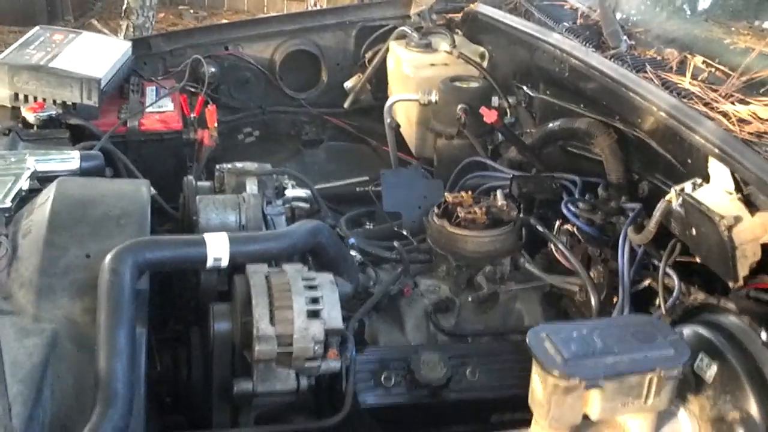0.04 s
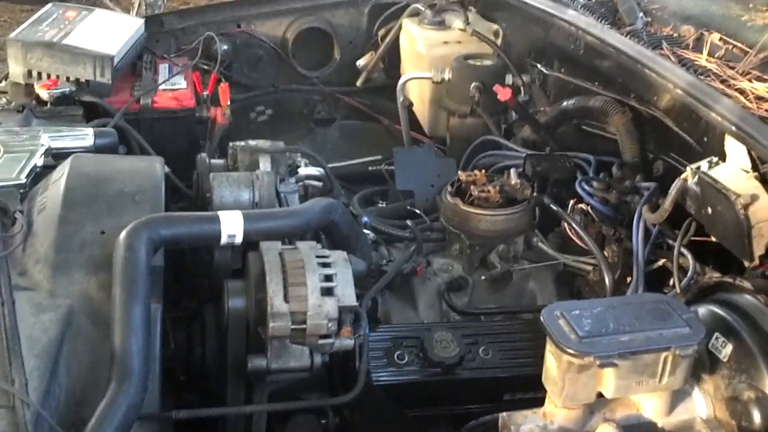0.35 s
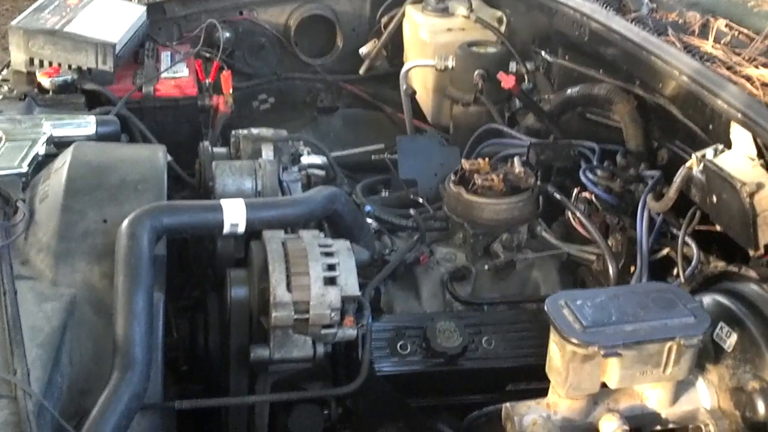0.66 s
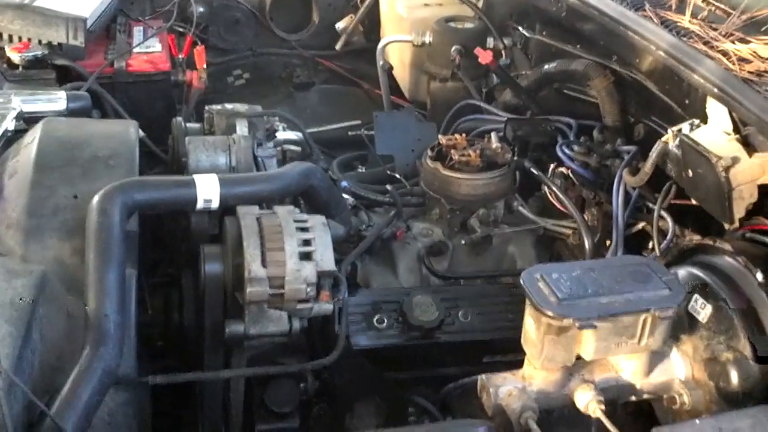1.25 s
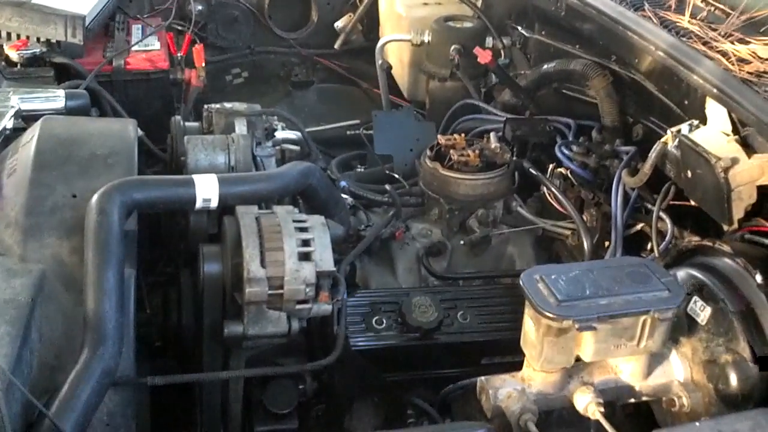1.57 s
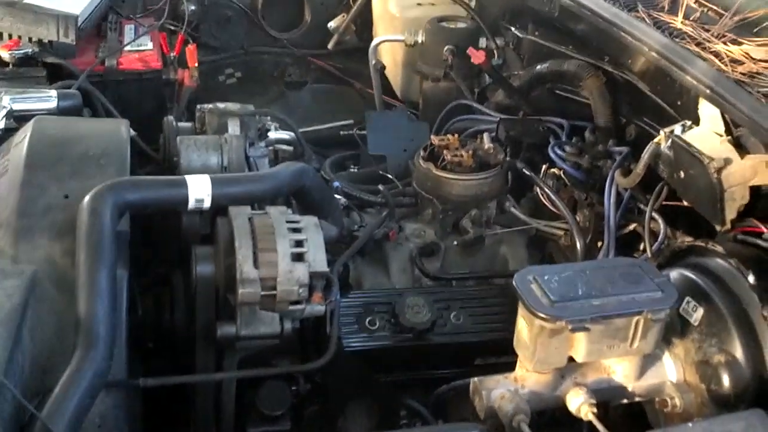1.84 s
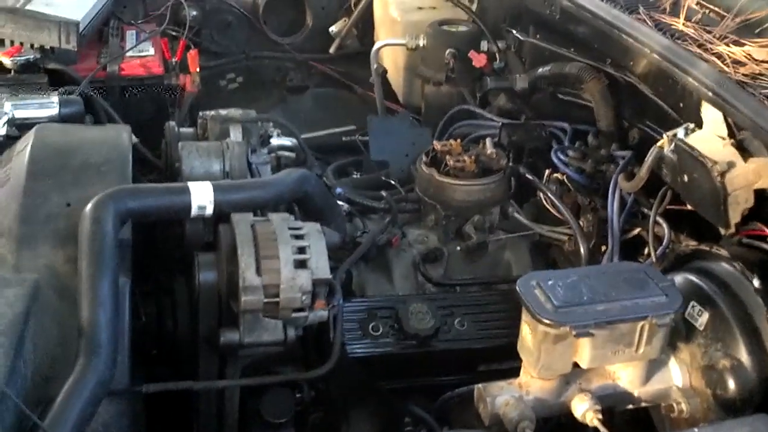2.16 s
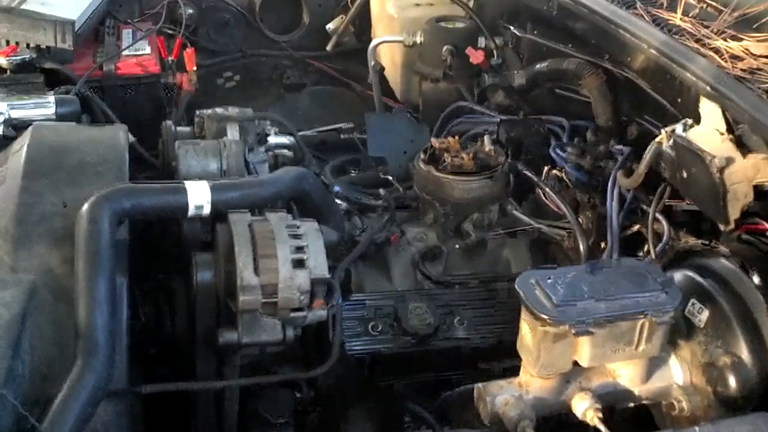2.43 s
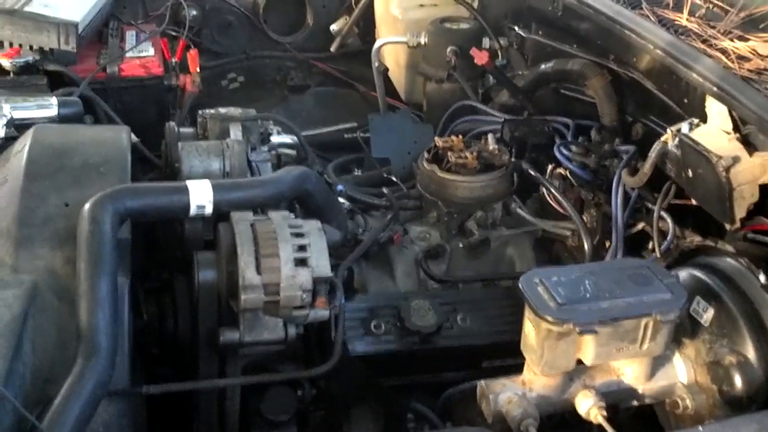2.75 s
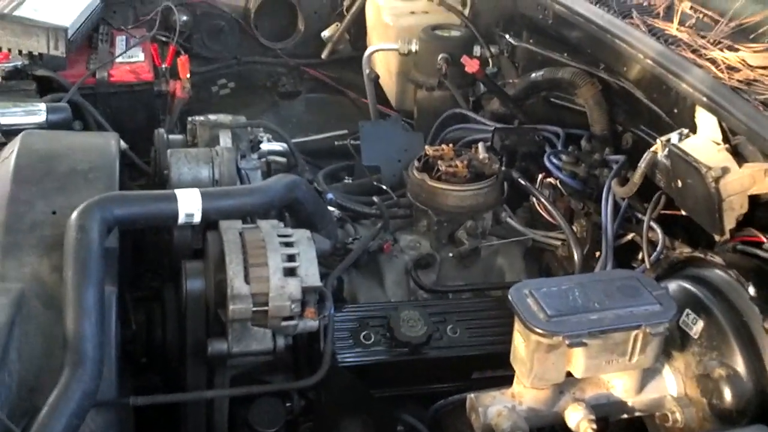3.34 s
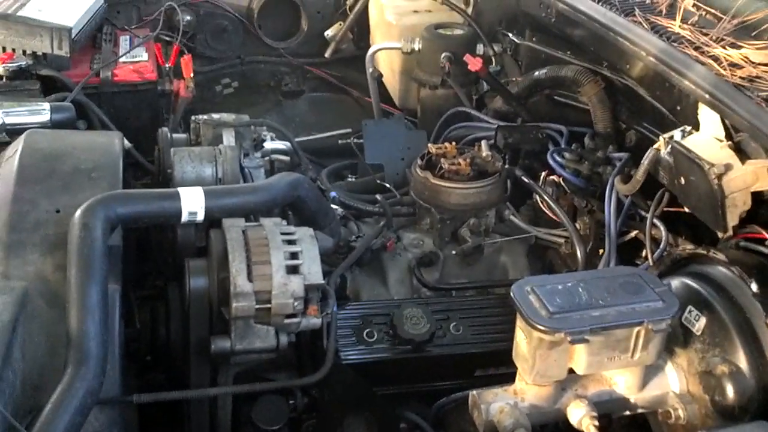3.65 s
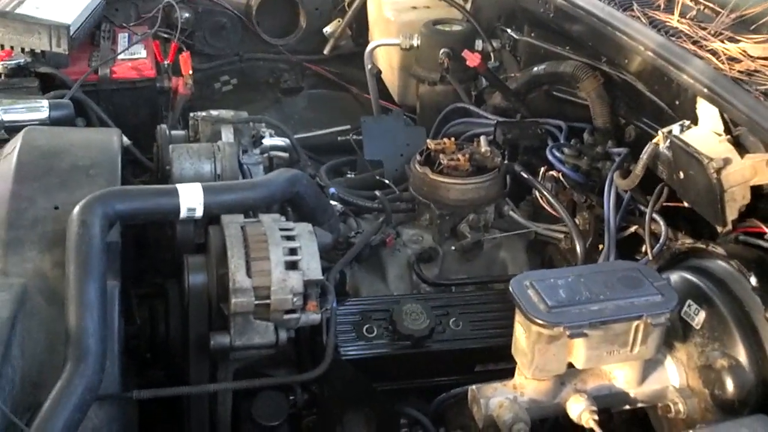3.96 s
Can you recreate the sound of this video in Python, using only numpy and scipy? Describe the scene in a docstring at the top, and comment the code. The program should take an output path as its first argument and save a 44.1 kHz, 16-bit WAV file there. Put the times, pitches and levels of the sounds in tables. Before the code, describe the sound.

A V8 engine idles steadily outdoors, heard from just above the open engine bay. Its low, slightly loping drone runs throughout, along with quick valve ticking, a high alternator whine, rushing fan air and a light hiss.

```python
"""An idling V8 engine

Heard from just above the open engine bay, the uneven firing makes a low drone and the valves clatter
in step. The belt turns a whining alternator and a fan, whose rush of air fills the bay over a light hiss.
The recorder widens the treble with a comb: left and right channels swing between in step and opposed."""
import sys
import numpy as np
from scipy.fft import rfft, irfft, next_fast_len
from scipy.io import wavfile
from scipy.ndimage import map_coordinates

SR = 44100
rng = np.random.default_rng(int(sys.argv[2]) if len(sys.argv) > 2 else 0)


def unload_audio(sound):
    """Save the sound as a 16-bit wav file, at the path given as the first command line argument."""
    columns = np.transpose(np.atleast_2d(sound))
    # keep every value between -1 and 1, then stretch to whole-number steps
    steps = np.round(np.clip(columns, -1, 1) * 32767)
    wavfile.write(sys.argv[1], SR, steps.astype(np.int16))


N = 176400  # 4 seconds
CYLINDERS = 8  # each fires once per engine cycle


def amp(db):
    """Turn decibels into a gain."""
    return 10 ** (np.asarray(db) / 20)


def unit(x):
    """Scale a signal to an average power of 1."""
    return x / np.sqrt(np.mean(x ** 2) + 1e-20)


def along(points, hz):
    """Read between (Hz, value) points on a log frequency axis."""
    freqs, values = np.transpose(points)
    return np.interp(np.log(hz + 1), np.log(freqs + 1), values)


def curve(rows):
    """Join (seconds, value) points, giving one value per sample."""
    return np.interp(np.arange(N) / SR, *np.transpose(rows))


def swell(rows):
    """A gain that follows a dB curve's rise and fall around its own average."""
    db = curve(rows)
    return amp(db - db.mean())


def wobble(rate):
    """A smooth curve through `rate` random values a second."""
    knots = rng.standard_normal(int(N * rate / SR) + 4)
    return map_coordinates(knots, [np.arange(N) * rate / SR], mode="mirror")


def filtered(x, response):
    """Scale and shift each frequency of x by response(hz)."""
    size = next_fast_len(N + SR // 2)
    return irfft(rfft(x, size) * response(np.fft.rfftfreq(size, 1 / SR)), size)[..., :N]


def tone(turns, flutter_db, jitter_rad, rate):
    """One tone, slightly unsteady in level and phase."""
    return unit(amp(flutter_db * wobble(rate)) * np.sin(2 * np.pi * turns + jitter_rad * wobble(rate)))


def tones(table, turns, flutter_db, jitter_rad, rate):
    """Stereo tones at multiples of one rate, offset in phase so that each pulse is smeared in time."""
    smear_turns = 0.203
    return sum(amp([[left], [right]]) * tone(k * turns + smear_turns * k ** 2, flutter_db, jitter_rad, rate)
               for k, left, right in table)


# How far the channels are out of step below the treble. Each row: frequency in Hz, left's lead in radians.
LEFT_LEAD = [(40, 1.7), (100, 1.35), (400, 1.15), (600, -.9), (850, -.15), (1378, 0)]
COMB_HZ = 2756  # the stereo-widening comb starts at half this frequency and repeats every COMB_HZ


def stereo_phase(hz):
    """The left channel's lead in radians: a gentle curve in the bass, the comb's half-turn steps above."""
    dwell = 0.97  # near 1, the steps are flat
    ramp = np.maximum(2 * np.pi * hz / COMB_HZ - np.pi, 0)
    return along(LEFT_LEAD, hz) + ramp - dwell * np.sin(2 * ramp) / 2


# Wide noise that differs between left and right channels.
# Each row: frequency in Hz, its greatest level in dB against the centre noise.
DIFFUSE_NOISE = [(60, -10), (250, -6.5), (520, -4), (900, -14), (1400, -13), (1800, 4), (2100, 6),
                 (3600, 3.5), (4800, 6), (15000, -15)]


def air_noise(spectrum):
    """Centre noise plus wide, diffuse noise, strongest between the steps of the stereo-widening comb."""
    def wide_gain(hz):
        between_steps = np.where(hz < COMB_HZ / 2, 1, np.abs(np.sin(stereo_phase(hz))))
        return amp(along(DIFFUSE_NOISE, hz)) * between_steps

    pair = rng.standard_normal(N) + filtered(rng.standard_normal((2, N)), wide_gain)
    return filtered(pair, lambda hz: amp(along(spectrum, hz)) * np.sqrt(SR / 2 / (1 + wide_gain(hz) ** 2)))


# The tone colour of the hiss. Each row: frequency in Hz, level in dB per Hz.
HISS_SPECTRUM = [(500, -120), (2000, -94), (3100, -75), (3700, -67.5), (4400, -67.5), (5100, -69),
                 (5900, -68), (7000, -72), (8400, -73), (9800, -78), (11600, -83.5), (13000, -75),
                 (14400, -73.5), (16000, -75.5)]
# How the hiss rises and falls. Each row: time in seconds, relative level in dB.
HISS_SWELL = [(0, -35), (0.13, -33.5), (0.3, -34.5), (0.75, -34), (0.85, -33.5), (0.92, -34), (0.99, -34),
              (1.1, -35.5), (1.22, -33), (1.32, -35), (1.41, -33.5), (1.52, -35), (2.7, -34.5),
              (2.9, -34.5), (3.1, -34), (3.72, -35), (3.82, -33.5), (3.9, -35)]


def hiss(cycles):
    """The belt and intake hiss, pulsing lightly as each cylinder draws in air."""
    pulsing = 1 + 0.048 * np.cos(2 * np.pi * cycles * CYLINDERS)
    flutter = amp(0.5 * wobble(rate=25.08))
    return flutter * swell(HISS_SWELL) * pulsing * air_noise(HISS_SPECTRUM)


# The tone colour of the fan's rushing air. Each row: frequency in Hz, relative level in dB.
RUSH_SPECTRUM = [(20, -93), (45, -85.5), (75, -86), (110, -65), (150, -72), (200, -57.5), (250, -63),
                 (320, -65), (420, -61), (540, -71), (760, -62.5), (950, -61), (1200, -60.5), (1380, -64.5),
                 (1600, -66.5), (1950, -66.5), (2400, -61.5), (2700, -57.5), (3200, -71), (4000, -71),
                 (8000, -120)]
# Which side the rush leans to. Each row: frequency in Hz, left minus right in dB.
RUSH_BALANCE = [(60, 2), (150, 1), (280, 4), (480, 4.5), (750, 1), (1500, 1), (1700, -5.5), (1920, -11.5),
                (2100, -2), (4000, 4.5)]
# How the rush and the valve clatter rise and fall. Each row: time in seconds, relative level in dB.
BAY_SWELL = [(0, -27), (0.08, -30), (0.16, -29), (0.33, -29.5), (0.72, -28.5), (0.84, -27), (0.92, -28.5),
             (1.3, -29), (1.4, -27), (1.5, -29.5), (1.61, -28.5), (1.7, -29.5), (2.43, -29.5), (2.5, -28.5),
             (2.6, -30), (2.8, -29.5), (2.92, -28.5), (3.05, -30), (3.55, -30.5), (3.7, -30), (3.82, -26.5),
             (3.9, -28.6)]
# The hum of the blades. Each row: multiple of the blade rate, left level in dB, right level in dB.
BLADE_TONES = [(6, -49, -58), (7, -64, -48), (9, -38.5, -42.5), (10, -42.5, -48), (11, -41.5, -40),
               (13, -42, -43)]


def fan(cycles):
    """The blades hum over a rush of air that pulses with the blades and the firings."""
    blades = cycles * 6.552  # blade passes per engine cycle
    blade_pulse = (np.cos(2 * np.pi * blades) + np.cos(2 * np.pi * 2 * blades)) / 2
    firing_pulse = np.cos(2 * np.pi * cycles * CYLINDERS)
    pulsing = unit(1 + 0.19 * blade_pulse + 0.086 * firing_pulse)
    air = air_noise(RUSH_SPECTRUM)
    air = filtered(air, lambda hz: amp(np.outer([.5, -.5], along(RUSH_BALANCE, hz))))
    low = filtered(air, lambda hz: 1 / (1 + (hz / 550) ** 6))
    rush = low + pulsing * (air - low)  # only the part above about 550 Hz pulses
    hum = tones(BLADE_TONES, blades, flutter_db=0.9, jitter_rad=0.23, rate=12)
    return amp(-0.5) * swell(BAY_SWELL) * rush + hum


# The whine's tones. Each row: multiple of the alternator's pitch, left and right relative levels in dB.
WHINE_TONES = [(2, -43.5, -43.5), (4, -68, -40.5), (5, -34, -32.5), (6, -31.5, -31.5), (7, -48.5, -47.5),
               (8, -40.5, -47.5), (9, -49.5, -41), (11, -54, -47.5), (12, -47.5, -46.5), (13, -46.5, -46)]
# How the whine rises and falls. Each row: time in seconds, relative level in dB.
WHINE_SWELL = [(0, -35), (0.33, -35.5), (0.7, -35), (1.25, -33.5), (1.8, -36), (2.3, -35.5), (2.8, -34),
               (3.3, -35), (3.8, -33), (4, -35)]
# How one shrill tone comes and goes. Each row: time in seconds, relative level in dB.
SHRILL_LEVEL = [(0, -40.5), (0.2, -37), (0.58, -37), (0.65, -43), (0.73, -45.5), (0.8, -44), (0.97, -39),
                (1.05, -43), (1.2, -38.3), (1.42, -35.5), (1.5, -39), (1.68, -39), (1.89, -41),
                (1.97, -37.5), (2.15, -34.5), (2.6, -35.5), (2.68, -37), (2.76, -36.5), (3.0, -33.8),
                (3.1, -34.5), (3.45, -34.5), (3.63, -38), (3.75, -37), (3.88, -37), (4, -35.5)]


def alternator(turns):
    """The alternator's whine flutters with the belt, and each of its tones wanders in level."""
    swaying = turns + 0.0035 * wobble(rate=35)  # the belt sways the pulley
    whine = 0
    for row in WHINE_TONES:
        drift = amp(1.5 + 1.3 * wobble(rate=3.08))
        whine += drift * tones([row], swaying, flutter_db=1.36, jitter_rad=0.14, rate=45)
    shrill = tone(10 * swaying, flutter_db=1, jitter_rad=0.27, rate=45)
    return swell(WHINE_SWELL) * whine + amp(curve(SHRILL_LEVEL) + 2) * shrill


# The tone colour of the valve taps. Each row: frequency in Hz, relative level in dB.
TAP_SPECTRUM = [(200, -43), (380, -23), (500, -12), (650, 0), (780, -1.5), (950, -6.5), (1300, -6),
                (2000, -17), (5000, -18.5), (12000, -38)]


def valve_clatter(cycles):
    """One tap per cylinder, each with its own strength and ring, repeats every cycle with fresh grit."""
    level_db, spread_db, decay_s = -38, 3, 0.0041
    cycle_samples = int(N / cycles[-1])
    firings = cycles * CYLINDERS
    since_tap_s = firings % 1 * cycle_samples / SR / CYLINDERS
    strength = amp(spread_db * rng.standard_normal(CYLINDERS))[firings.astype(int) % CYLINDERS]
    ring = map_coordinates(rng.standard_normal(cycle_samples), [cycles % 1 * cycle_samples], mode="wrap")
    grit = 0.59 * rng.standard_normal(N)
    taps = strength * np.exp(-since_tap_s / decay_s) * (ring + grit)
    clatter = filtered(taps, lambda hz: amp(along(TAP_SPECTRUM, hz)))
    return amp(level_db) * swell(BAY_SWELL) * unit(clatter)


# The drone's tones. Each row: multiple of the engine's cycle rate, left and right relative levels in dB.
FIRING_TONES = [(5, -58, -41), (6, -49, -47), (7, -54, -42), (8, -46, -31.5), (9, -64, -53),
                (10, -55.5, -43), (12, -44.5, -35), (13, -49, -39.5), (14, -41, -42), (15, -45, -38.5),
                (16, -32.5, -30), (17, -30.5, -27), (18, -39.5, -38), (20, -34.5, -28), (24, -43.5, -50),
                (26, -49.5, -57), (32, -42, -53.5), (34, -44.5, -48.5), (39, -44, -53), (40, -51, -46),
                (51, -43.5, -45)]
# How the drone rises and falls. Each row: time in seconds, relative level in dB.
DRONE_SWELL = [(0, -26), (0.2, -24.5), (0.45, -25), (0.75, -26.5), (0.85, -25.5), (0.9, -26.5), (0.98, -26),
               (1.06, -26), (1.2, -26), (1.4, -25), (1.92, -26.7), (2.15, -24.5), (2.4, -24.7),
               (2.82, -25.5), (2.9, -24), (3.04, -26), (3.12, -24), (3.3, -24), (3.6, -25), (3.82, -24),
               (3.9, -25.5)]


def firing_drone(cycles):
    """Unequal firings, smeared by the exhaust, make tones that beat together into a loping idle."""
    drone = tones(FIRING_TONES, cycles, flutter_db=0.56, jitter_rad=0.047, rate=14)
    return amp(0.02) * swell(DRONE_SWELL) * drone


# The alternator's pitch, which follows the idle speed. Each row: time in seconds, pitch in Hz.
ALTERNATOR_PITCH = [(0, 422.1), (.2, 420.7), (.43, 420.2), (.65, 424.1), (.8, 425.3), (1.03, 423.0),
                    (1.3, 422.2), (1.6, 422.5), (1.88, 423.6), (2.22, 419.1), (2.47, 421.0), (2.8, 422.1),
                    (3.0, 421.6), (3.27, 418.3), (3.45, 418.7), (3.72, 420.7), (3.91, 424.2), (4, 423.5)]


def scene():
    """One shaft speed drives every part."""
    turns = np.cumsum(curve(ALTERNATOR_PITCH)) / SR  # waves of that pitch so far
    cycles = turns / 23.685  # four-stroke engine cycles so far
    return firing_drone(cycles) + valve_clatter(cycles) + alternator(turns) + fan(cycles) + hiss(cycles)


def record(dry):
    """The recorder widens the sound by shifting the channels out of step, and cuts the highest treble."""
    top_hz = 15760
    return filtered(dry, lambda hz: np.exp(1j * np.outer([.5, -.5], stereo_phase(hz))) * (hz < top_hz))


dry = scene()
out = record(dry)
unload_audio(out)
```